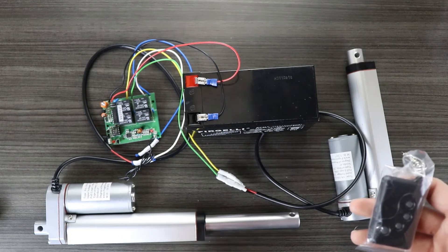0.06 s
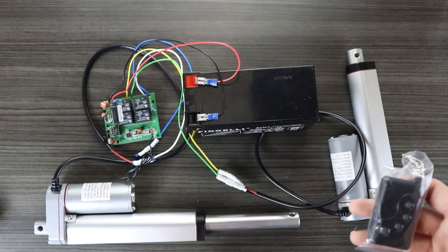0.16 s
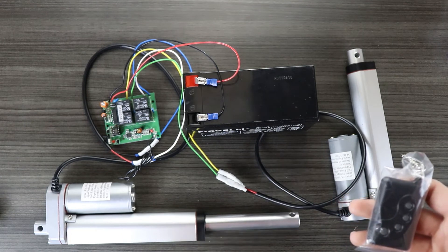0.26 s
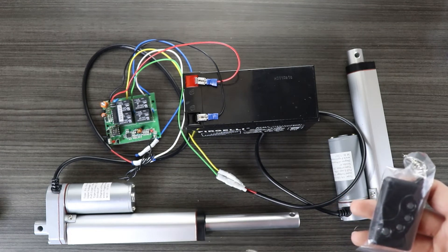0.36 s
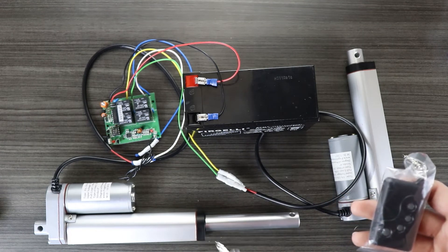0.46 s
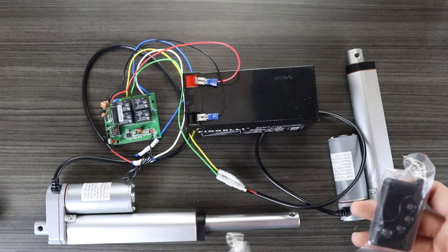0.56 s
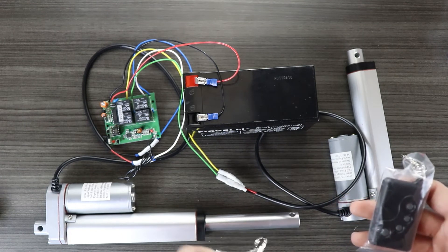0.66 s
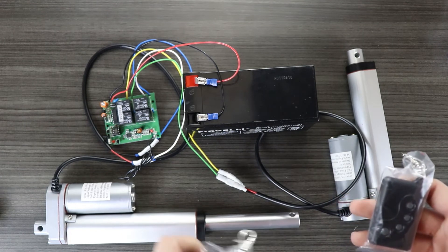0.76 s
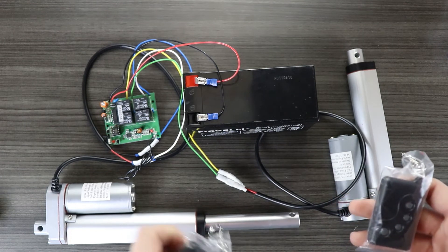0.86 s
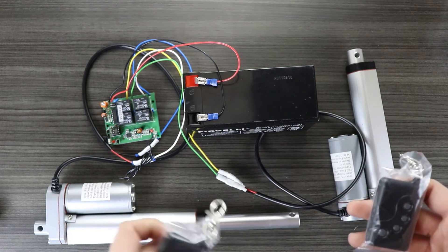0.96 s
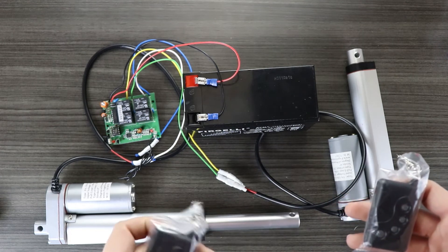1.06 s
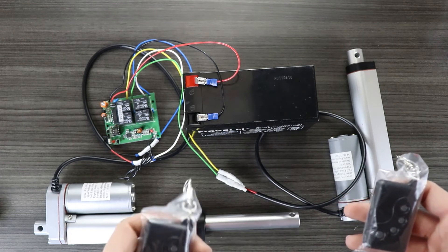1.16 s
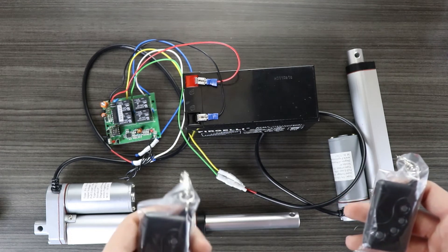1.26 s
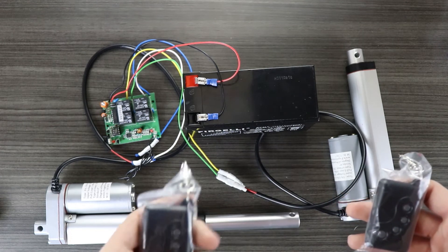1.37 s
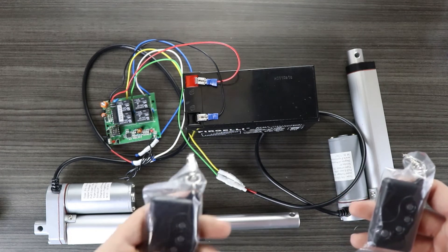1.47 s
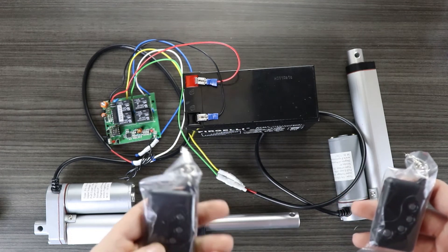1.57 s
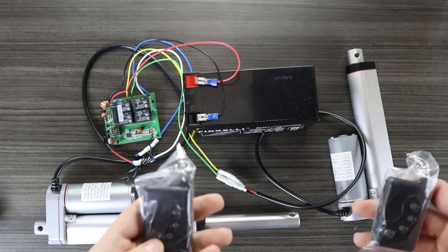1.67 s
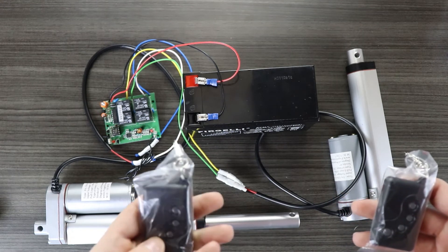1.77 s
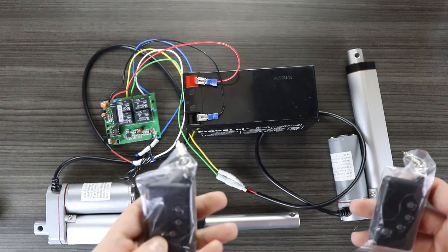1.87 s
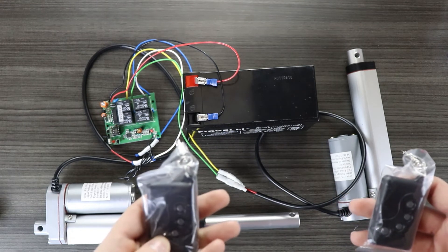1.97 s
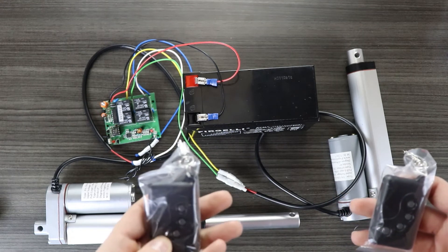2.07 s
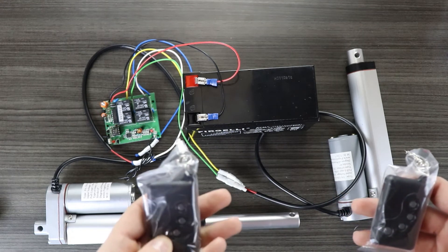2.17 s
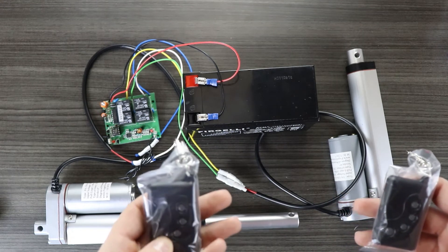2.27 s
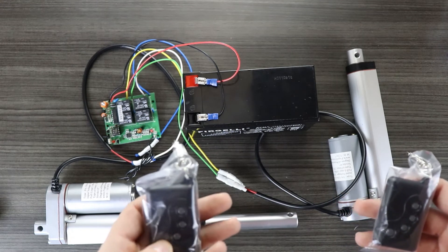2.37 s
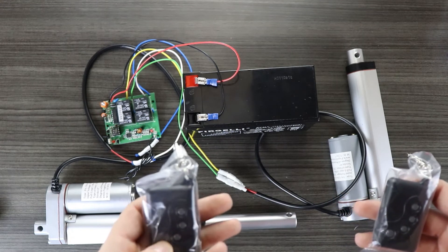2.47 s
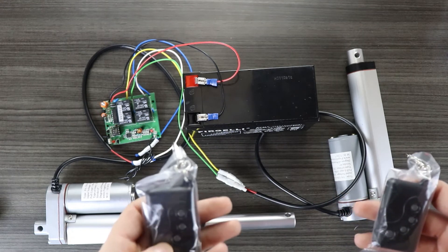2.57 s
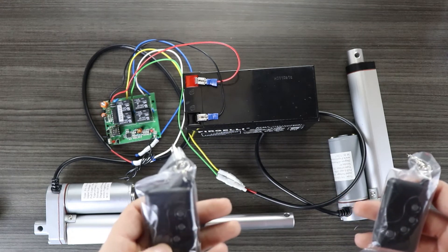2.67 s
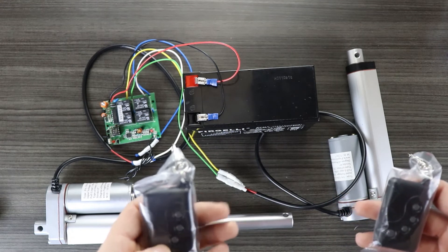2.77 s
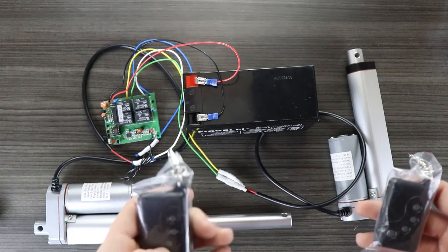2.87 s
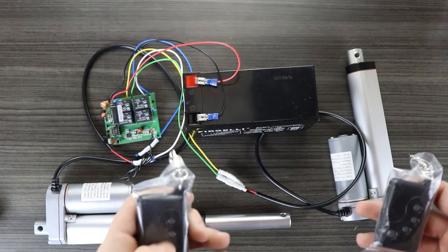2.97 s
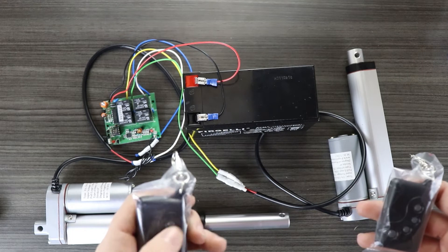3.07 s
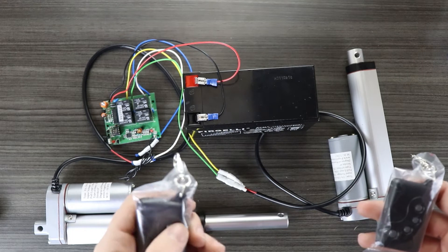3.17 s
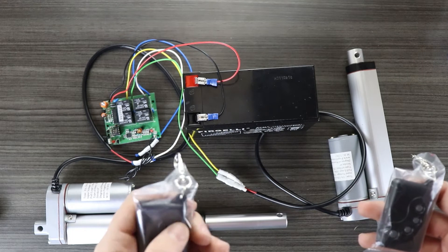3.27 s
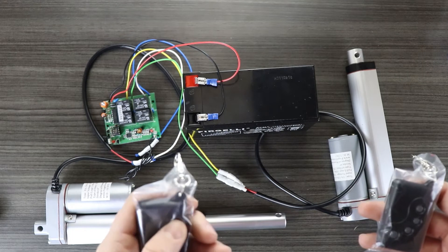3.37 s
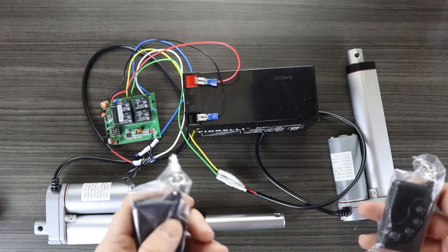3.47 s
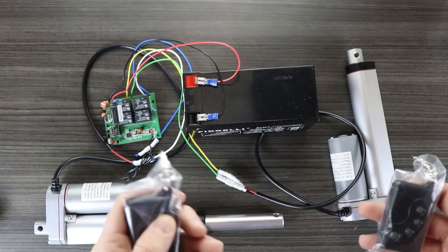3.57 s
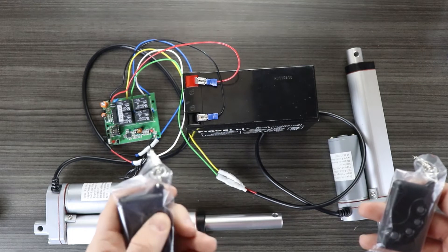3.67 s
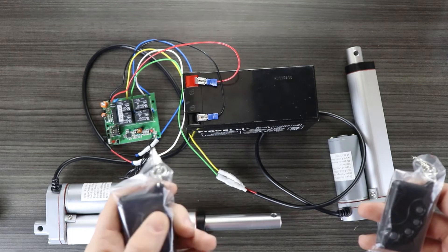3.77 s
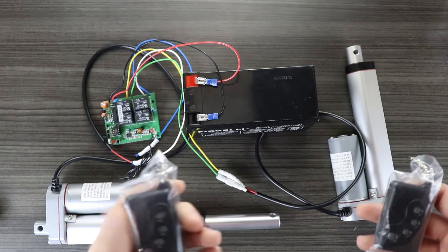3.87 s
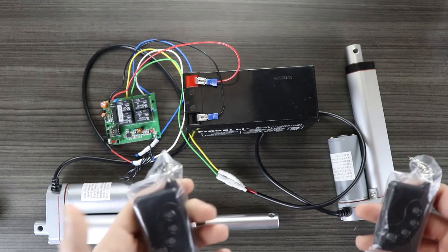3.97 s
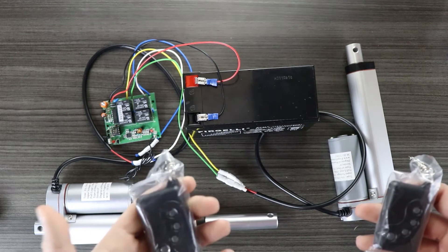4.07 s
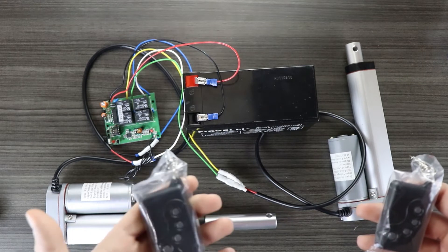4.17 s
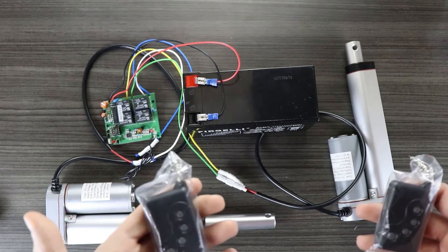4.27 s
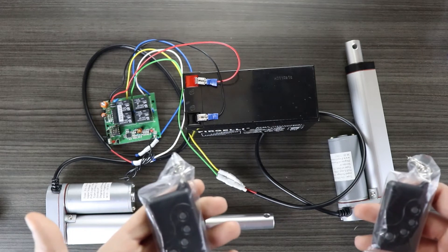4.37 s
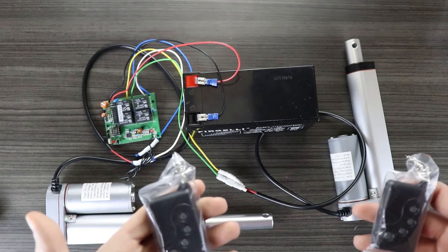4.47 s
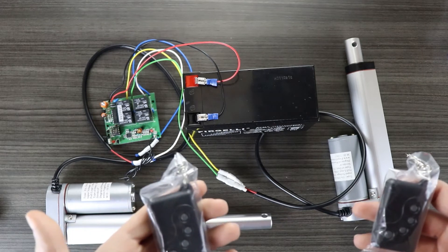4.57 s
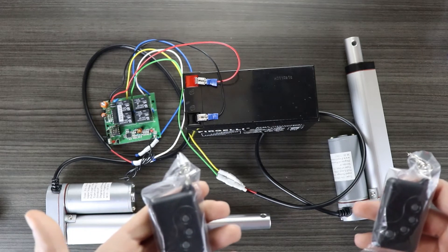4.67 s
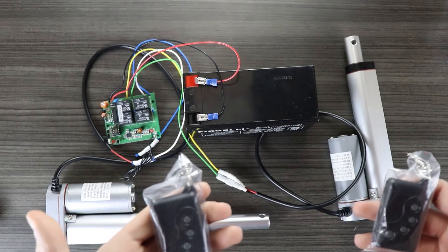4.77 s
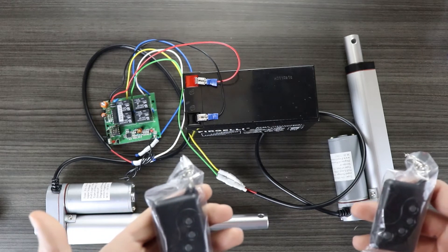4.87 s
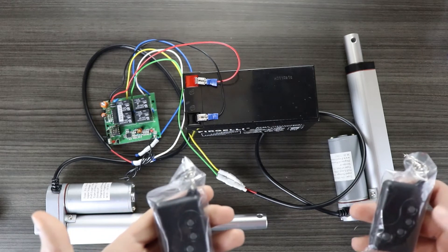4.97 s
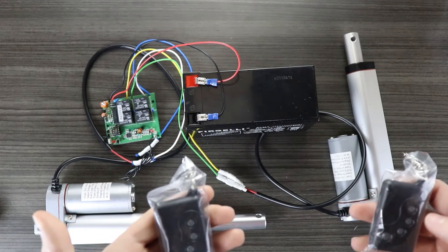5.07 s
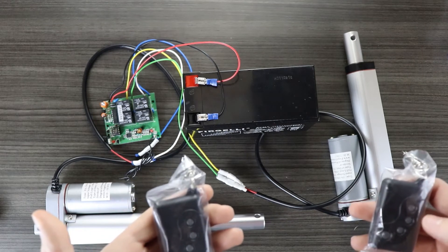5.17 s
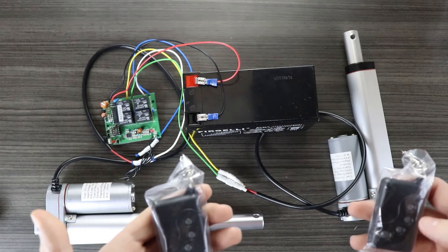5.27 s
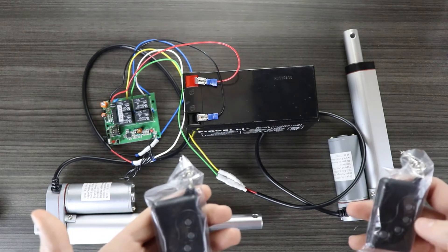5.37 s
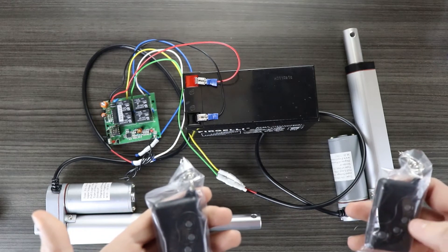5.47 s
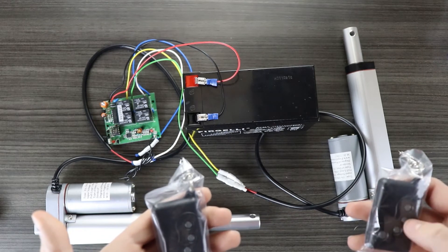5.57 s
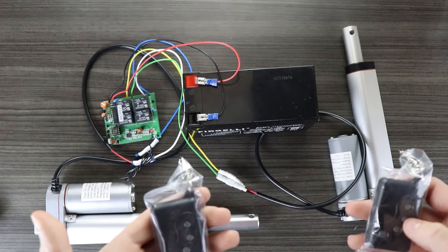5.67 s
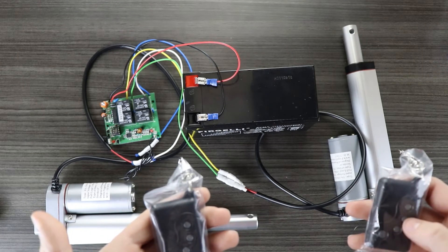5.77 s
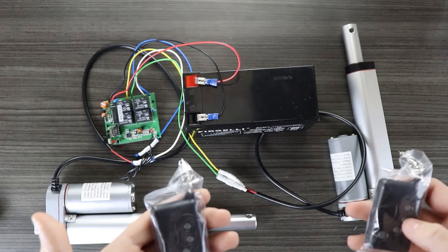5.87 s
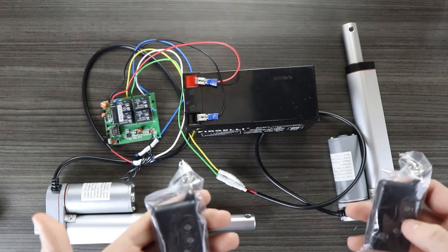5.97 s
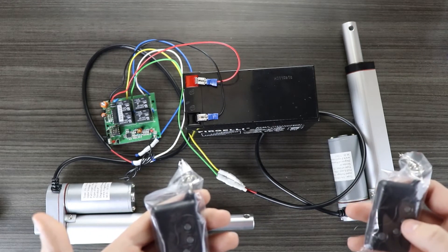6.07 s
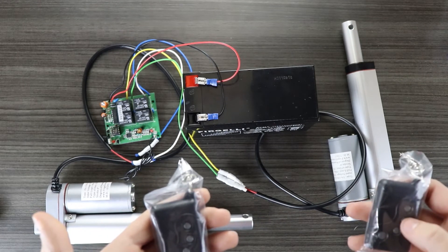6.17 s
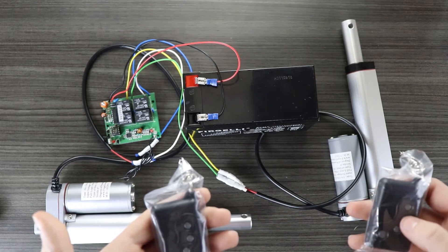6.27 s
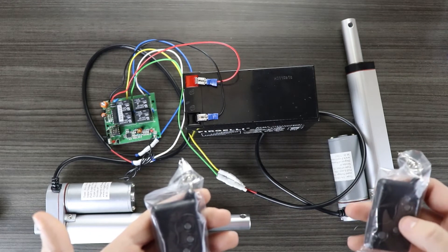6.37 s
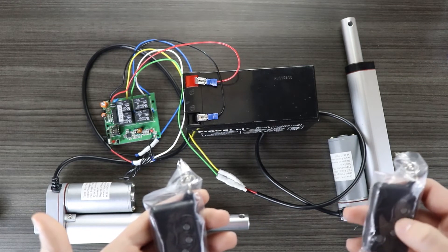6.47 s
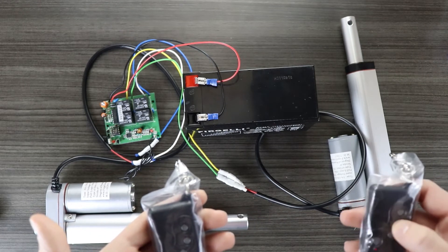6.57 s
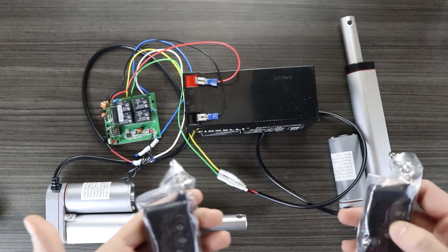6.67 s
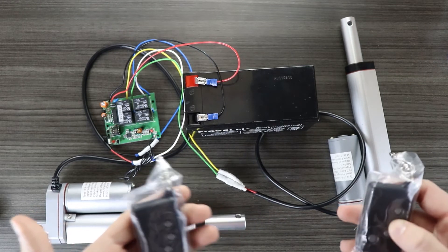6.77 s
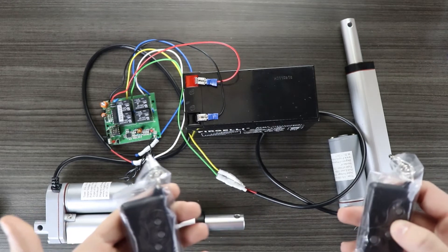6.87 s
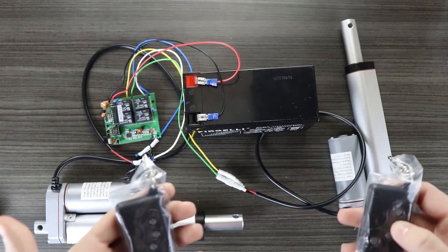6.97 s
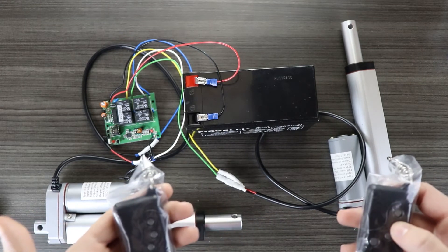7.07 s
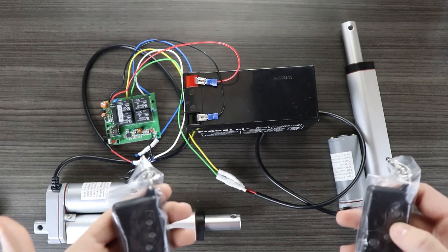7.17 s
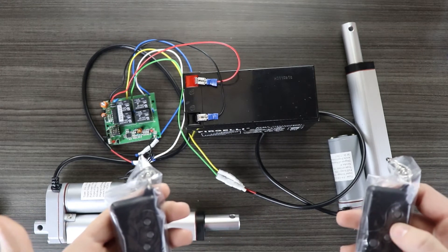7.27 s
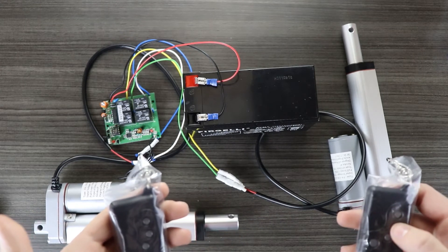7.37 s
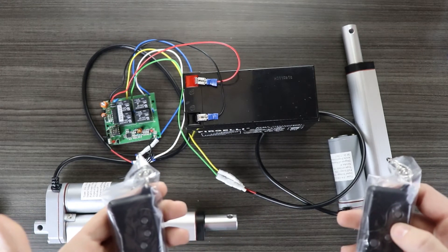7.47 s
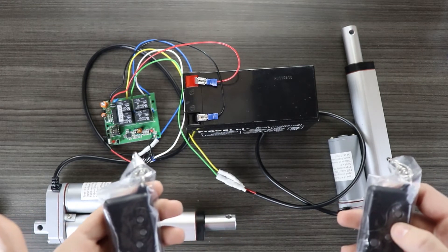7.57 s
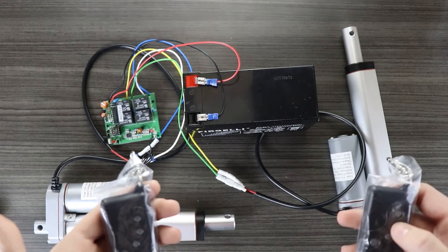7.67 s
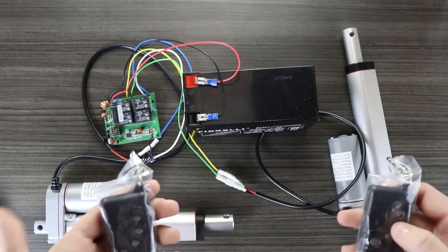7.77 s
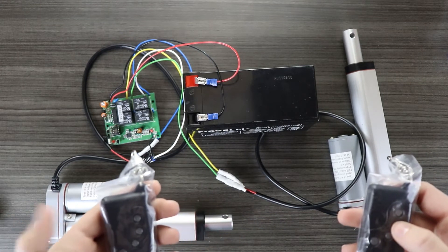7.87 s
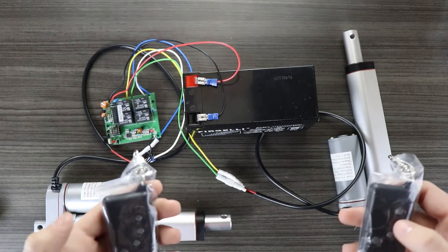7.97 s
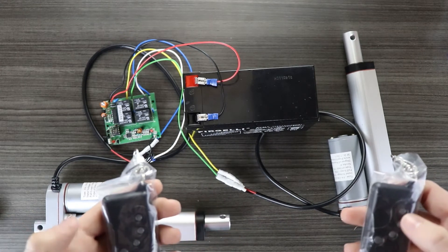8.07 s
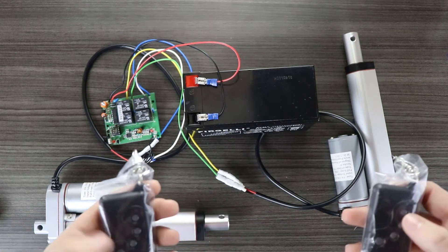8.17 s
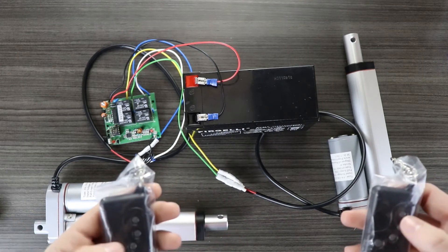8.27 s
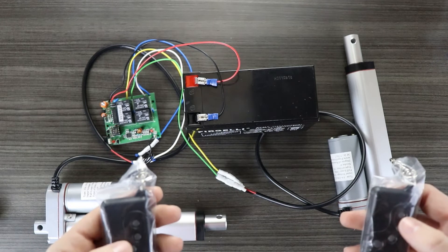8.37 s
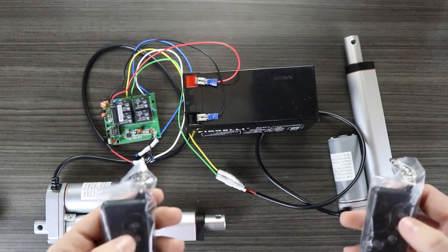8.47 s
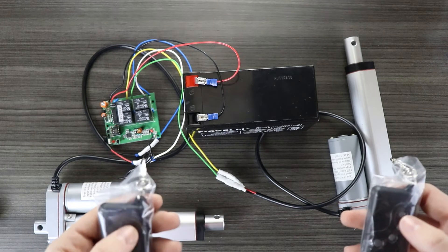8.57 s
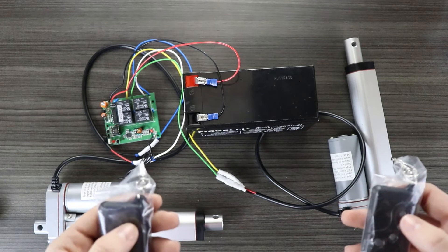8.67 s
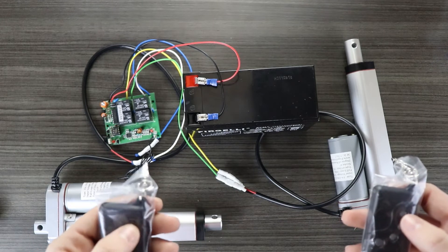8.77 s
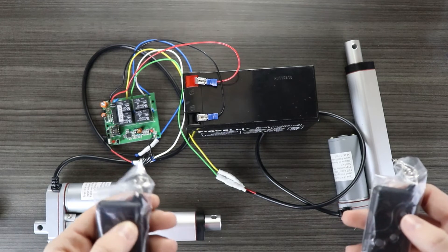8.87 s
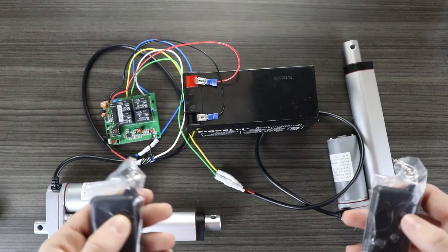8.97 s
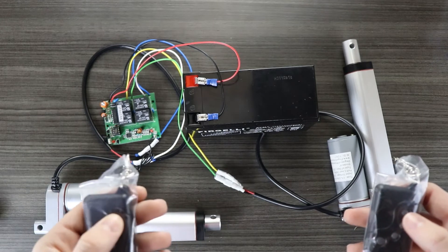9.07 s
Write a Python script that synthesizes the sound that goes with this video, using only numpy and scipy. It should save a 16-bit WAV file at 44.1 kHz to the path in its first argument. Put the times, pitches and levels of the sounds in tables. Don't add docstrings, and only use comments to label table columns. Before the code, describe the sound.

A quiet indoor room with faint hum, heard closely in stereo. From 0 to about 1.9 seconds, thin plastic bags crackle in sharp, uneven snaps, busiest around 0.6 to 1.2, with very thin high film squeaks from 1.3 to 1.9. At 2.1 a button snaps, and a relay ticks just before a small geared motor spins up at 2.25, settling by 2.5 into a steady nasal whine near 800 hertz with brushy, gritty hiss. Clicks fall at 3.1, 3.4 and 3.5; a relay and soft knocks at 3.65 bring in a second motor, thickening the whirr. At 6.6 another press, then a relay click and heavier knocks around 6.75 as it reverses, the pitch dipping briefly. The two whines run together, beating gradually faster. A click at 8.9 precedes a rapid wind-down, a relay click, and a hard, ringing knock at 9.08, leaving near silence.

```python
import sys
import numpy as np
from scipy import signal
from scipy.fft import rfft, irfft, next_fast_len
from scipy.io import wavfile
from scipy.ndimage import uniform_filter1d, map_coordinates

SR = 44100
rng = np.random.default_rng(int(sys.argv[2]) if len(sys.argv) > 2 else 0)


def waveform_to_disk(signal):
    frames = np.transpose(np.atleast_2d(signal))
    scaled = np.clip(frames, -1, 1) * 32767
    samples = np.round(scaled).astype(np.int16)
    wavfile.write(sys.argv[1], SR, samples)


def boost_factor(decibels):
    exponent = np.asarray(decibels, float) / 20
    return 10 ** exponent


N = 402191
T = np.arange(N) / SR
SMALL_MODES = rng.standard_normal(320)
CLICK_PAN_DB = -3
STAGE_S = [2.2, 2.48, 3.68, 6.78, 9.2]
# start_s, pinion_hz, level_db
COAST = [
    (8.815, 802.5, -67),
    (8.84, 795.5, -34.5),
    (8.9, 778, -50),
    (8.94, 698, -45),
    (9.0, 547, -52),
    (9.03, 440.7, -61),
]


def level(x, db):
    return x * boost_factor(db) / np.sqrt(np.mean(x ** 2))


def curve(rows, col):
    return np.interp(T, np.array(rows)[:, 0], np.array(rows)[:, col])


def shape(points, hz):
    return np.interp(np.log(hz + 1), np.log(np.array(points)[:, 0]), np.array(points)[:, 1])


def colour(x, db_of):
    size = next_fast_len(N)
    hz = np.arange(size // 2 + 1) * SR / size
    return irfft(rfft(x, size) * boost_factor(db_of(hz)), size)[..., :N]


def walk(rate_hz):
    k = int(SR / rate_hz)
    held = np.repeat(rng.standard_normal(N // k + 1), k)
    return 1.288 * uniform_filter1d(uniform_filter1d(held, k), k)[:N]


def wide(mid, side):
    # hz, side_minus_mid_db
    width = [(60, -29), (110, -6), (200, -12.5), (380, -7.5), (700, -10.5), (1290, -1), (2380, 0),
             (4400, 2.5), (8120, 4.5), (15000, 5)]
    # hz, left_minus_right_db
    lean = [(60, 0.5), (110, 0.79), (200, 0.3), (380, 0), (700, 2.5), (1290, -1), (2380, -0.7),
            (4400, -0.3), (8120, -3), (15000, -0.5)]
    size = next_fast_len(N)
    hz = np.arange(size // 2 + 1) * SR / size
    skew = irfft(rfft(mid, size) * 1j * np.sign(np.cos(hz / 170 - .9)), size)[:N]
    side = colour(0.36 * skew + 0.54 * side, lambda hz: shape(width, hz))
    left = colour(mid + side, lambda hz: shape(lean, hz) / 2)
    right = colour(mid - side, lambda hz: -shape(lean, hz) / 2)
    return np.array([left, right])


def ring(modes, length_s):
    t = T[:int(length_s * SR)]
    out = 0
    for hz, db, t60_s in modes:
        out = out + rng.choice([-1, 1]) * boost_factor(db) * np.sin(2 * np.pi * hz * t) * 1000. ** (-t / t60_s)
    return out


def add(out, sound, s):
    i = int(s * SR)
    out[..., i:i + sound.shape[-1]] += sound[..., :N - i]


def room():
    # hz, level_db_per_hz
    air_db = [(12, -47), (20, -16), (70, -13.5), (153, -12.5), (185, -17), (225, -7.5), (324, -14),
              (614, -15.5), (788, -24), (2680, -29), (15500, -56)]
    # hz, level_db
    hum = [(118.4, -75), (220.7, -71), (279, -71.5), (590, -78)]
    air = level(colour(rng.standard_normal((2, N)), lambda hz: shape(air_db, hz)), -62)
    out = wide(*air) * boost_factor(.6 * walk(4.3))
    for hz, db in hum:
        out += np.sqrt(2) * boost_factor(db + 1.1 * walk(2.54)) * np.sin(2 * np.pi * hz * T)
    return out


def squeaks():
    # start_s, pitch_hz, level_db
    glides = [
        [(1.35, 10800, -90), (1.38, 10820, -76), (1.44, 10980, -76), (1.5, 11500, -77), (1.57, 11900, -78),
         (1.61, 12300, -69), (1.655, 12520, -71), (1.7, 12050, -73), (1.83, 9900, -82)],
        [(1.29, 12100, -90), (1.32, 12250, -77), (1.4, 12600, -77), (1.44, 12720, -78), (1.53, 12400, -84)],
        [(1.45, 13600, -86), (1.6, 13500, -79), (1.67, 13350, -79), (1.75, 12800, -86)],
        [(1.55, 12650, -82), (1.65, 13150, -80)],
        [(1.76, 12900, -81), (1.795, 11950, -81)],
        [(1.81, 12250, -84), (1.84, 12000, -78), (1.865, 11500, -84)],
    ]
    out, waver, flicker_db = np.zeros(N), 1 + .002 * walk(70), 3 * walk(60)
    for k, rows in enumerate(glides):
        on = (T > rows[0][0]) & (T < rows[-1][0])
        turns = np.cumsum((curve(rows, 1) * waver)[on]) / SR
        level_db = curve(rows, 2)[on] + flicker_db[k * 9000:][:len(turns)]
        out[on] += np.sin(2 * np.pi * turns) * boost_factor(level_db)
    return out * boost_factor(np.array([[3], [5]]))


def snap(peak_db, hz, pan_db, decay_ms, ring_share, low_db, low_hz, top_hz):
    t = T[:3000]
    noise = rng.standard_normal((3, len(t)))
    noise = noise[0] + 0.75 * noise[1:]
    attack = np.minimum(t * 1000 / (0.078 * decay_ms ** 2), 1)
    tail = 0.066 * np.exp(-t / 0.014) * np.repeat(rng.uniform(.3, 1.5, size=30), 100)
    burst = noise * attack * (np.exp(-t * 1000 / decay_ms) + tail)
    tone = signal.lfilter(*signal.iirpeak(min(hz, 14000), 4.5, fs=SR), burst)
    broad = signal.lfilter(*signal.butter(2, [max(0.45 * hz, 900), top_hz], "band", fs=SR), burst)
    low = signal.lfilter(*signal.iirpeak(low_hz, 1.6, fs=SR), burst)
    sound = ring_share * 3 * tone + (1 - ring_share) * broad + 4 * boost_factor(low_db) * low
    return sound / np.abs(sound).max() * boost_factor(peak_db + np.array([[pan_db], [-pan_db]]) / 2)


def bags():
    # start_s, peak_db, ring_hz, low_share_db
    crackle = [(0.0515, -22, 3250, -12), (0.1006, -25, 5300, -7), (0.1256, -27, 9500, -26),
               (0.159, -36, 5750, -20), (0.2057, -34.5, 1330, 13), (0.2728, -27, 5900, -26),
               (0.3127, -21.5, 6500, -8.5), (0.408, -34, 2160, -31), (0.4334, -32, 6940, -29),
               (0.5739, -27, 5100, -31), (0.602, -29, 3600, -28), (0.618, -27, 4100, -2),
               (0.6528, -23, 5370, -37), (0.6894, -15, 4830, -17), (0.7215, -18.5, 3800, -33),
               (0.7741, -36, 1010, -4), (0.8046, -17.5, 4730, -21), (0.9042, -18.5, 2300, -14),
               (0.9348, -30.5, 1330, -30), (1.0155, -24.5, 3250, -31), (1.0498, -38, 4270, -32),
               (1.1429, -17, 6200, -25), (1.1893, -35, 1940, -16), (1.2363, -34.5, 2930, -27),
               (1.3414, -38.5, 1450, 13), (1.5145, -31.5, 7950, -22), (1.536, -20, 4400, -18),
               (1.6366, -23.5, 4650, -13.5), (1.739, -38.5, 1190, -5), (1.8304, -28.5, 4000, -4)]
    # start_s, peak_db, ring_hz
    faint = [(.0722, -35, 1930), (.179, -42, 1630), (.2224, -40, 3450), (.3426, -42, 5050),
             (.392, -39, 2070), (.5013, -40, 2970), (.5469, -46, 3960), (.5518, -43, 2900),
             (.6555, -30, 8000), (.6655, -39, 3640), (.671, -34, 6500), (.681, -39, 5200),
             (.7265, -36, 3400), (.7552, -37, 7800), (.862, -46, 1170), (.9562, -39, 3470),
             (.9827, -42, 3700), (1.022, -35, 3000), (1.028, -37, 2200), (1.055, -36, 5020),
             (1.1114, -43, 2350), (1.2161, -45, 2730), (1.2535, -39, 2570), (1.2895, -43, 3110),
             (1.4142, -41, 1840), (1.653, -36, 1600), (1.6945, -42, 4000), (2.0667, -52, 3600)]
    # start_s, level_db
    rustle = [(0.0, -48), (0.35, -65), (0.43, -59), (.63, -61), (.665, -52), (.7, -54), (.75, -60),
              (0.8, -61), (0.96, -62), (1.03, -57), (1.1, -63), (1.62, -62), (1.91, -72.5), (2.14, -78),
              (2.23, -70)]
    # hz, level_db_per_hz
    film = [(180, -47), (300, -22), (584, -10.5), (1120, -4.5), (1390, -4), (1690, -4.5), (2100, -2.5),
            (6300, -8.5), (16000, -16.5)]
    out = np.zeros((2, N))
    folds = crackle + [(s, db + 1.5, hz, -22) for s, db, hz in faint]
    for (s, db, hz, low_db), side in zip(folds, rng.random(len(folds))):
        pan_db = -1.5 - 0.5 * (2 * side - 1)
        add(out, snap(db + 1.0, hz, pan_db, decay_ms=0.95, ring_share=0.39,
                      low_db=low_db, low_hz=1240, top_hz=8500), s)
    size_db = np.minimum(3.5 * rng.exponential(size=N), 16)
    grains = rng.standard_normal((2, N)) * (.6 + boost_factor(size_db) * (rng.random(N) < .015))
    grains = level(colour(grains, lambda hz: shape(film, hz)), 0)
    creak_db = 2.5 * walk(120)
    return out + wide(*grains) * boost_factor(curve(rustle, 1) + creak_db) * (T < rustle[-1][0])


def relay(peak_db, kind):
    # hz, level_db, t60_s
    modes = [
        [(3230, -10, .016), (5300, -12, .007), (5850, -6, .008), (6200, 0, .013), (7750, -9, .007),
         (8870, -10, .007), (13100, -13, .006), (15200, -14, .006)],
        [(3300, -13, .01), (4970, -10, .008), (6300, -12, .006), (7550, -7, .008), (8400, -6, .008),
         (8860, 0, .011), (9540, -6, .007), (11050, -15, .014)],
    ]
    # delay_s, level_db, crack_db
    hits = [
        [(0, 0, -19), (.003, -10, -5), (.0048, -14, -14)],
        [(0, -7, -20), (.0013, -8, -20), (.0024, 0, -13), (.0035, -3, -18), (.005, -12, -20)],
    ]
    out, t = np.zeros((2, 2500)), T[:int(.035 * SR)]
    band = signal.butter(2, [5000, 15000], "band", fs=SR)
    for wait_s, db, crack_db in hits[kind]:
        both, left, right = (ring(modes[kind], .035) for _ in range(3))
        frame = (both + .4 * np.array([left, right])) * np.minimum(t / .0005, 1)
        crack = signal.lfilter(*band, rng.standard_normal((2, len(t))) * np.exp(-t / .0008))
        add(out, boost_factor(db) * frame + 2 * boost_factor(crack_db) * crack, wait_s)
    return out / np.abs(out).max() * boost_factor(peak_db + CLICK_PAN_DB * np.array([[.5], [-.5]]))


def remotes():
    # start_s, peak_db, ring_hz, case_share_db
    clicks = [(2.1505, -21, 6700, -8), (2.1876, -12.5, 3500, -6), (2.3535, -12, 1900, -8),
              (3.061, -13.5, 7600, -7), (3.3588, -12, 10490, 0), (9.043, -15, 8900, -2),
              (2.243, -20, 2200, -12), (6.7508, -13, 2000, -16), (9.0812, -18, 2600, -8),
              (6.7548, -19, 2900, -10), (6.797, -22, 4900, -12)]
    # start_s, button_db, button_ring_hz, relay_db, relay_kind (0 pulls in, 1 drops out)
    presses = [
        (2.0885, -9.5, 6000, -13.5, 0),
        (3.5018, -9, 6800, -8.5, 1),
        (6.5907, -15, 4910, -6, 0),
        (8.878, -8.5, 5600, -8.5, 1),
    ]
    out, relay_lag_s = np.zeros((2, N)), .1422
    for s, db, hz, relay_db, kind in presses:
        clicks = clicks + [(s, db + 2, hz, -17)]
        add(out, relay(relay_db, kind), s + relay_lag_s)
    for s, db, hz, case_db in clicks:
        add(out, snap(db - 2, hz, CLICK_PAN_DB, decay_ms=1.2, ring_share=0.45,
                      low_db=case_db, low_hz=2920, top_hz=min(1.9 * hz, 13000)), s)
    return out


def knocks():
    # start_s, peak_db, hardness (0-1)
    blows = [(.002, -39, 0.02), (.036, -39, 0), (.07, -40.5, 0.11), (0.093, -42.5, 0.12),
             (2.232, -40.5, 0.12), (3.661, -25, 0.5), (3.669, -23.5, 0.3), (3.681, -23.5, 0.22),
             (3.69, -28, 0.4), (6.75, -16.5, 0.45), (6.763, -20.5, 0.5), (6.78, -19, 0.34),
             (6.791, -22.5, 0.6), (6.811, -31, 0.14), (6.829, -36, 0), (6.86, -44, 0.04),
             (9.0318, -17, 0.38), (9.04, -20, 0.3), (9.05, -29, 0.1), (9.081, -6.5, 0.87),
             (9.104, -25, 0.07)]
    # hz, level_db, t60_s
    desk_modes = [(105, -31, 0.08), (165, -13, 0.09), (205, -14, .08), (258.7, -9.5, 0.07),
                  (320, -9.5, 0.06), (400, -14, .05), (474, -13, 0.06)]
    # hz, level_db, t60_s
    tube_modes = [(806, 7.5, 0.033), (926, -2.5, 0.061), (1033, -8, 0.05), (1317, -2.5, 0.036),
                  (1620, -17, 0.036), (2250, -6, 0.016)]
    out = np.zeros(N)
    band = signal.butter(1, [200, 2300], "band", fs=SR)

    def struck(modes, detune, soft_db):
        return ring([(hz * d, db - soft_db * np.log2(hz / 180), t60_s)
                     for (hz, db, t60_s), d in zip(modes, detune)], .2)

    for s, db, hard in blows:
        soft_db = 9 * max(1 - hard / .2, 0)
        detune = 1 + .06 * rng.standard_normal(13)
        desk = struck(desk_modes, detune, soft_db)
        tube = struck(tube_modes, detune[7:] ** (.3 if hard > .8 else 2), soft_db)
        scrape = signal.lfilter(*band, rng.standard_normal(len(desk))) * np.exp(-T[:len(desk)] / 0.0075)
        blow = (1 - 0.75 * hard) * desk + hard * tube + (0.28 + 0.6 * hard) * scrape
        add(out, boost_factor(db) * blow / np.abs(blow).max(), s)
    out = signal.sosfilt(signal.butter(2, [78, 3500], "band", fs=SR, output="sos"), out)
    return np.array([out * boost_factor(4.0), out * boost_factor(1.5)])


def turn_pattern(turns, order_db, drift, wobble_db):
    rows, size = 64, 2048
    steps = rng.standard_normal((rows, len(order_db)))
    slip = np.cumsum(steps, axis=0) * drift * np.sqrt(np.arange(len(order_db)))
    gain = boost_factor(order_db + wobble_db * rng.standard_normal(slip.shape))
    start = 2 * np.pi * rng.random(len(order_db))
    table = irfft(gain * np.exp(1j * (start + slip)), size) * size / np.sqrt(2)
    table = np.c_[table, table[:, :1]]
    return map_coordinates(table, [T / T[-1] * (rows - 1), turns % 1 * size], order=1)


def geared(rows):
    # shaft_multiple, level_db
    orders = [(12, -6), (14, -16), (16, 0), (18, -5), (20, -19), (23, -12), (44, -13), (46, -12), (48, -2),
              (61, -16)]
    start_s, end_s = rows[0][0], rows[-1][0]
    hunt = 1 + .0008 * walk(9) + .008 * walk(60) * (T < start_s + .23)
    turns = np.cumsum(curve(rows, 1) * hunt) / SR / 16
    order_db = np.full(64, -60.)
    order_db[[k for k, _ in orders]] = [db for _, db in orders]
    pattern = turn_pattern(turns, order_db, drift=0.044, wobble_db=0.8)
    tones = boost_factor(curve(rows, 2)) * pattern * (T > start_s) * (T < end_s)
    return colour(tones, lambda hz: (hz > 1500) * (-14 + 15 / (1 + ((hz - 2380) / 110) ** 2)))


def supply_sag(col):
    # start_s, pinion_sag_hz, tone_dip_db, held_s
    sags = [
        (3.651, 30, 4.3, 0.01242),
        (6.735, 15, 7.2, 0.05004),
    ]
    fall_s, recover_s, out = 0.0217, .03, 0
    for row in sags:
        fall = np.clip((T - row[0]) / fall_s, 0, 1)
        recovery = np.exp(-np.maximum(T - row[0] - fall_s - row[3], 0) / recover_s)
        out = out + row[col] * fall * recovery
    return out


def body_db(stage, hz):
    # hz, level_db_per_hz
    hiss = [
        [(41, -75), (70, -48), (202, -28), (547, -31), (613, -10), (701, -20), (803, -3), (962, -20.5),
         (1150, -22.5), (3330, -15.5), (4090, -26.5), (4680, -26.5), (15500, -35)],
        [(41, -72), (70, -49), (511, -19.5), (599, -11), (717, -20), (803, -2.5), (1050, -22), (1730, -20),
         (2320, -13.5), (3330, -17), (3820, -25), (4680, -26.5), (15500, -31)],
        [(41, -71), (70, -48), (446, -25), (599, -11.5), (701, -15.5), (803, -3), (1010, -20.5), (1850, -18.5),
         (2030, -12), (3190, -16.5), (5360, -25.5), (9860, -28.5), (15500, -30)],
    ]
    # hz, width_hz, level_db
    housing = [(1171, 180, 9), (2210, 900, 5.5), (3250, 130, 3), (3630, 130, 1), (4650, 1020, 7),
               (5900, 420, 6.5), (6200, 130, -15), (7470, 75, 12), (9200, 99, -3), (9880, 2100, 5),
               (13500, 230, 3), (13800, 600, -3), (15000, 550, 3)]
    ripple_db = 2.6 * np.interp(hz, np.arange(len(SMALL_MODES)) * 70., SMALL_MODES)
    resonance_db = sum(db / (1 + (2 * (hz - f) / w) ** 2) for f, w, db in housing)
    return shape(hiss[max(stage - 1, 0)], hz) + resonance_db + ripple_db


def stage_share(stage):
    edge_s = np.array([-.02, .02])
    rise = np.interp(T, STAGE_S[stage] + edge_s, [0, 1])
    return rise * np.interp(T, STAGE_S[stage + 1] + edge_s, [1, 0])


def pinion_tones(turns, level_db):
    step_s, slip_hz_per_s, slip_start_turns, partner_db = 7.08, 2.13, 0.065, -12.5
    slip = slip_start_turns + slip_hz_per_s * (T - step_s) ** 2 / 2
    partner = boost_factor(partner_db) * np.clip((T - STAGE_S[3]) / 0.038, 0, 1) * (T < COAST[0][0])
    both = np.sin(2 * np.pi * 16 * turns) + partner * np.sin(2 * np.pi * (16 * turns + slip))
    return np.sqrt(2) * boost_factor(level_db + .5 * walk(14)) * both


def gear_teeth(turns, near_hz, load_db):
    stage_pinion_hz = [751, 814, 807, 807]
    # shaft_multiple, level_db
    unbalance = [(2, -70), (4, -64)]
    # hz, level_db
    slack = [(796.7, -45), (1125, -47), (1362, -53), (1690, -52), (2304, -50), (2821, -54), (3004, -56),
             (3192, -56), (3381, -45), (3946, -58), (4506, -55), (4603, -51), (4980, -58)]
    # hz, level_db
    alone = [(204.6, -57), (608.3, -45), (662.1, -55), (764.4, -53), (866.7, -53), (1168, -53), (1475, -57),
             (1626, -59), (1830, -57), (2239, -52), (2492, -52), (2595, -53), (2697, -54), (2950, -49),
             (3257, -51), (3461, -50), (3661, -59), (4527, -53), (4883, -57)]
    # hz, level_db
    opposed = [(602.9, -42), (656.8, -53), (1464, -56), (1615, -56), (2471, -54), (2724, -56), (2778, -54),
               (2929, -55), (3079, -52), (3128, -53), (3230, -45), (3429, -56), (3580, -55), (4037, -62),
               (4490, -59)]
    # hz, level_db
    together = [(602.9, -42), (656.8, -51), (909.8, -51), (1163, -54), (1211, -52), (1464, -55),
                (1615, -54), (2073, -48), (2326, -49), (2422, -51), (2724, -53), (2772, -52), (2923, -53),
                (3128, -54), (3225, -46), (3278, -51), (4032, -55), (4484, -55)]
    teeth, order = 0, np.arange(300)
    for stage, lines in enumerate((slack, alone, opposed, together)):
        shaft_hz = stage_pinion_hz[stage] / 16
        order_db = body_db(stage, order * shaft_hz) - 47 + 3 * rng.standard_normal(len(order))
        order_db[[round(k) for k, _ in unbalance]] = [db for _, db in unbalance]
        order_db[5:11] -= 6 * (stage == 1)
        order_db[16] = -90
        for hz, db in lines:
            k = round(hz / shaft_hz)
            if abs(hz / shaft_hz - k) < .13 and k != 16:
                order_db[k] = db + 2 * (hz > 1000)
        teeth = teeth + stage_share(stage) * turn_pattern(turns, order_db, drift=.045, wobble_db=1.2)
    speed_gain = np.clip((near_hz - 560) / 190, 0, 1) ** 2
    return teeth * speed_gain * boost_factor(0.95 * np.minimum(load_db, 0) * (T > STAGE_S[2]))


def gear_hiss(dip_db):
    stage_gear_db = [-41.5, -44.5, -39.5, -39.5]
    stage_brush_db = [-44.5, -43, -43.5, -44]
    unload_s, stop_s, loose_db, stop_db_per_s = 8.78, 9.066, 4, -110
    loose_s = np.clip(T - unload_s, 0, stop_s - unload_s)
    rattle_db = loose_db * np.minimum(loose_s / 0.029, 1) + stop_db_per_s * np.maximum(T - stop_s, 0)
    gear_db = -14 * loose_s + rattle_db - 0.6 * dip_db
    brush_db = -36 * loose_s + rattle_db - 0.65 * dip_db
    hiss = 0
    for stage in range(4):
        share = stage_share(stage)
        gear_db = gear_db + share * stage_gear_db[stage]
        brush_db = brush_db + share * stage_brush_db[stage]
        noise = colour(rng.standard_normal((2, N)), lambda hz: body_db(stage, hz))
        hiss = hiss + np.sqrt(share) * level(noise, 0)
    gear = signal.sosfiltfilt(signal.butter(2, 5500, fs=SR, output="sos"), hiss)
    brush = level(hiss - gear, 0.1) * boost_factor(brush_db + 0.37 * walk(25))
    return level(gear, 0.67) * boost_factor(gear_db + 0.4 * walk(18) + 1.6 * walk(350)) + brush


def motors():
    # start_s, pinion_hz, level_db
    near = [(2.23, 420, -62), (2.27, 706, -52), (2.31, 745, -43), (2.46, 752.4, -45), (2.485, 795, -33),
            (2.53, 807.4, -29.5), (2.6, 813.4, -31), (3.64, 816.3, -32), (3.9, 808.7, -31),
            (5.0, 806.7, -32.5), (6.73, 808.2, -30), (6.86, 807, -27), (8.815, 804.6, -27.5),
            (8.83, 800, -50), (8.87, 814.5, -38), (9.02, 819, -38), (9.04, 774, -53), (9.12, 730, -44)]
    # start_s, pinion_hz, level_db
    far = [(3.66, 425, -70), (3.7, 700, -42), (3.84, 733.3, -42), (3.88, 787.4, -41), (4.3, 796.7, -41.5),
           (5.0, 796, -42), (6.0, 791.8, -44), (6.73, 800, -41.5), (6.76, 700, -70)]
    near_hz, dip_db = curve(near, 1) - supply_sag(1), supply_sag(2)
    hunt = 1 + .0006 * walk(9) + .0008 * walk(60) * (T < STAGE_S[1])
    turns = np.cumsum(near_hz * hunt) / SR / 16
    running = np.clip((T - near[0][0]) / 0.012, 0, 1)
    pinion_db = curve(near, 2) - dip_db
    tones = pinion_tones(turns, pinion_db) + gear_teeth(turns, near_hz, pinion_db + 32)
    tones = tones + geared(far) + geared(COAST)
    chop = 1 + .22 * np.sin(2 * np.pi * turns) + .14 * np.sin(10 * np.pi * turns)
    chop = chop + .12 * np.sin(2 * np.pi * 1.4 * turns)
    hiss = gear_hiss(dip_db)
    return running * wide(tones + chop * hiss[0], 0.096 * np.roll(tones, 37) + chop * hiss[1])


def scene():
    return motors() + bags() + remotes() + squeaks() + knocks() + room()


def low_pass(x):
    return signal.sosfilt(signal.butter(12, 16810, fs=SR, output="sos"), x)


def record(dry):
    rounded = .6 * np.tanh(dry / .6)
    mix = signal.sosfilt(signal.ellip(10, .2, 60, 15750, fs=SR, output="sos"), rounded)
    return low_pass(mix)


dry = scene()
out = record(dry)
waveform_to_disk(out)
```